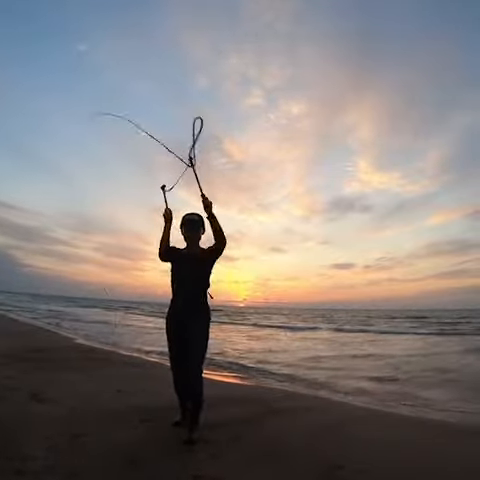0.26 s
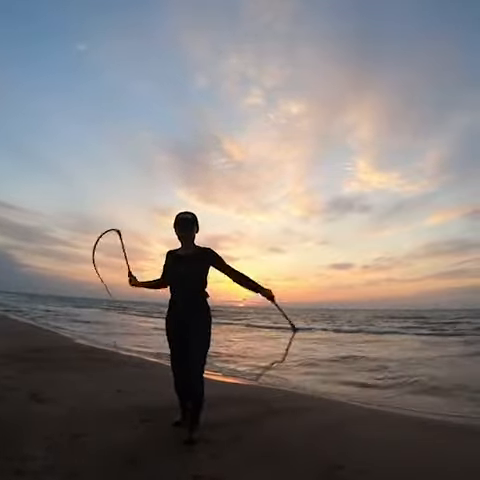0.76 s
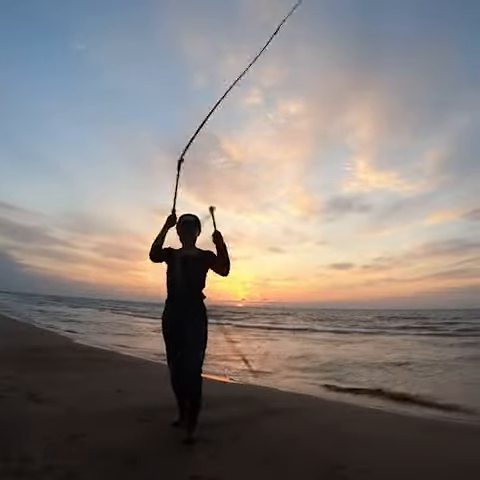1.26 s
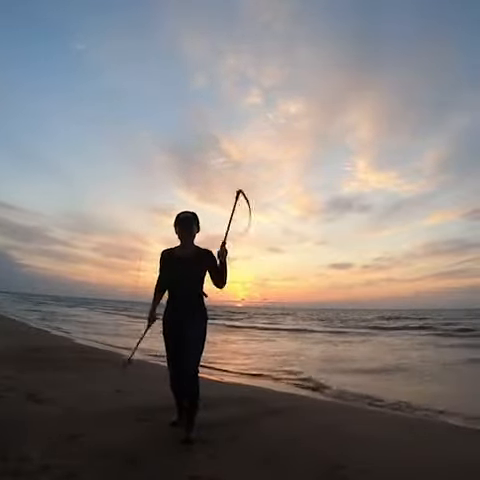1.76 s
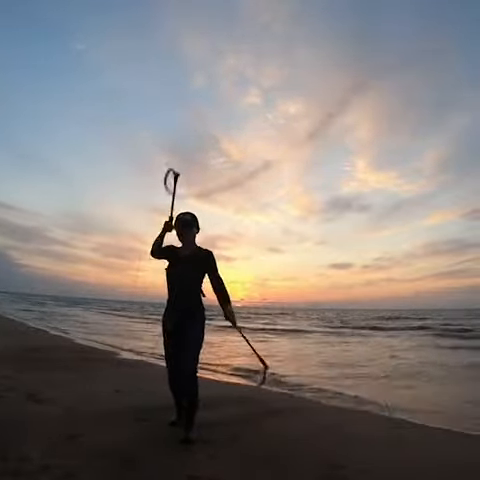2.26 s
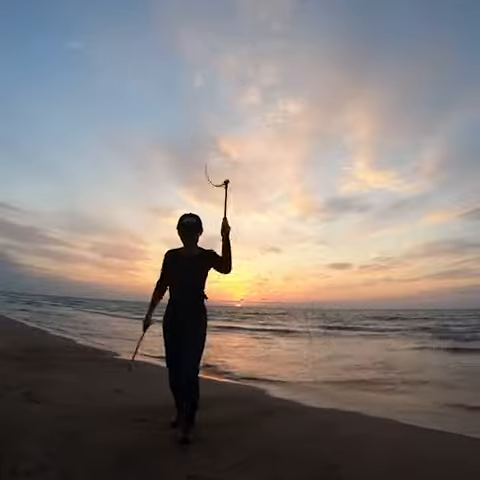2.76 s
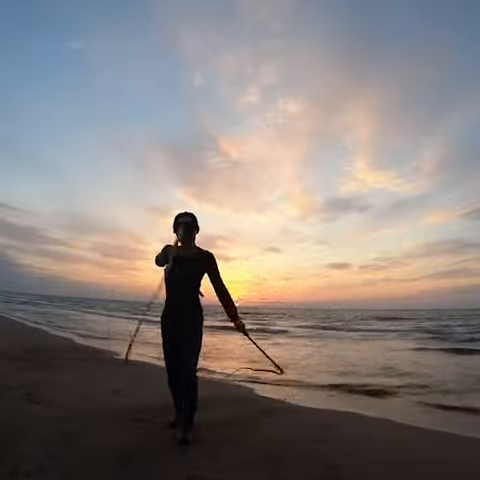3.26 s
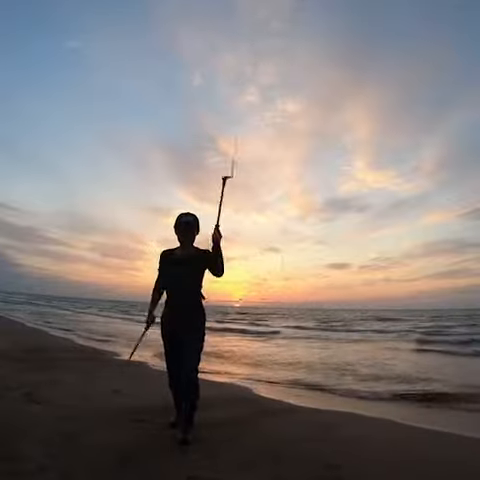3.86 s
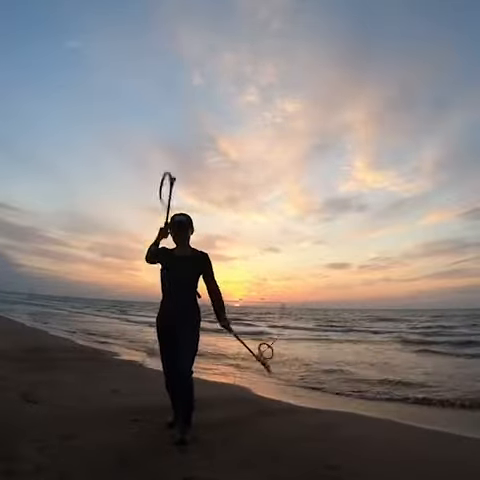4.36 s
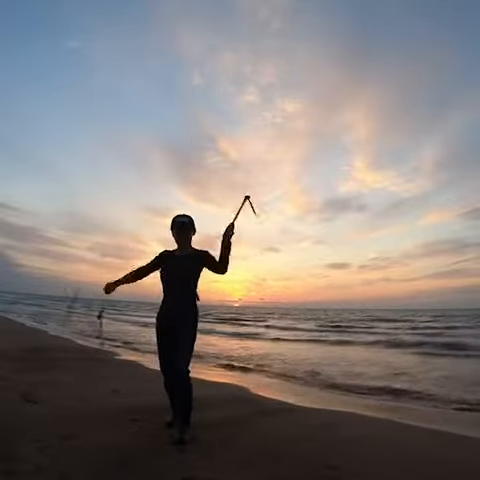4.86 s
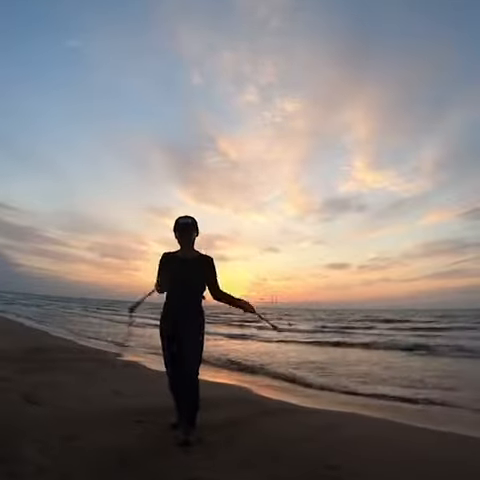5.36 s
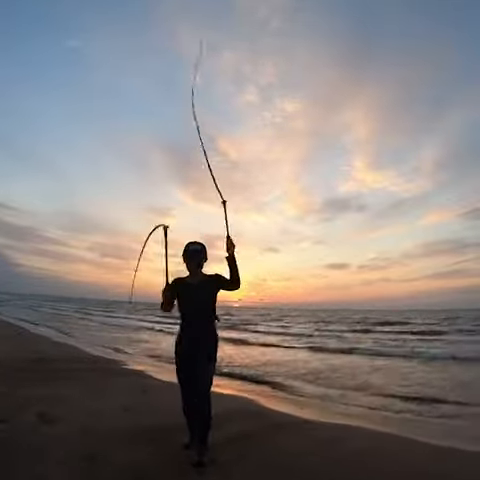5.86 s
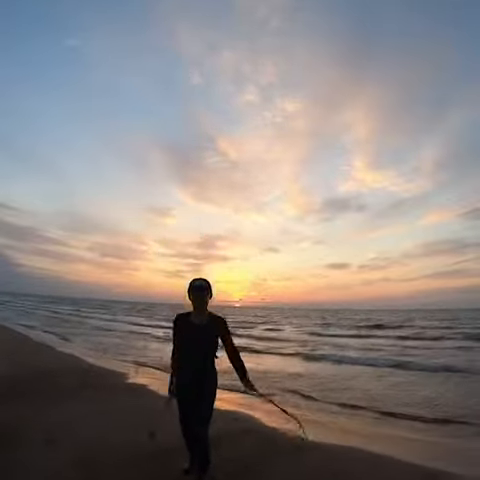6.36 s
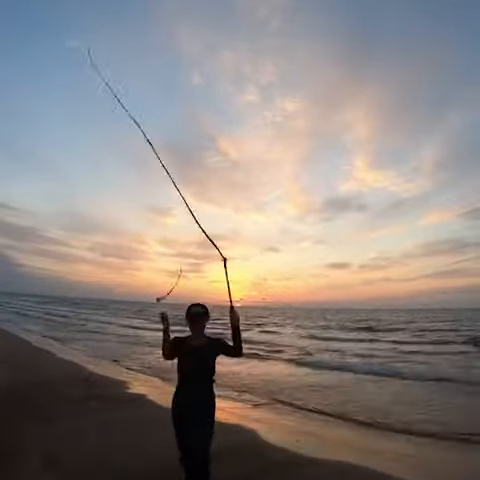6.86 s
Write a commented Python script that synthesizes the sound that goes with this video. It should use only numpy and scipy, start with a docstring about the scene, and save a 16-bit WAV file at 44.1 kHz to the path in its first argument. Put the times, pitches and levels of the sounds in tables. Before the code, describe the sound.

On an open beach, two whips are swung and cracked close to the microphone. Hard, bright, gunshot-like snaps come about once or twice a second, mixed with much weaker flicks and short airy swishes. Low fuzzy hums of the moving lashes fill some gaps. Behind them lie faint steady surf hiss and deep wind rumble. The loud cracks clip slightly and briefly push down the background.

```python
"""On a beach, two whips crack and snap in front of a microphone.
Far surf is filtered noise in stereo; wind is a deep rumble and a flutter that each crack stirs up.
Lashes hum as tones blurred by noise. Each crack is a short shock and a tail; loud ones push the membrane.
A streaky pre-echo hiss lies ahead of each crack, and thin pre-echo tones ahead of the loud ones.
A limiter pulls everything above the bass down after every loud crack."""
import sys
import numpy as np
from scipy import signal
from scipy.fft import rfft, irfft, next_fast_len
from scipy.io import wavfile
from scipy.ndimage import uniform_filter1d, map_coordinates

SR = 44100
rng = np.random.default_rng(int(sys.argv[2]) if len(sys.argv) > 2 else 0)


def wav_record(signal):
    """Record a signal, one row per channel, as 16-bit PCM in the file named by sys.argv[1]."""
    frames = np.transpose(np.atleast_2d(signal))
    bounded = np.clip(frames, -1, 1)
    # unit amplitude maps onto the largest positive 16-bit level
    quanta = np.round(bounded * 32767).astype(np.int16)
    wavfile.write(sys.argv[1], SR, quanta)


def gain_from_decibels(decibels):
    """Convert decibel values to linear amplitude factors."""
    exponent = np.asarray(decibels, float) / 20
    return 10 ** exponent


N = 313551
TIME = np.arange(N) / SR


def unit(x):
    """Normalization: scales a signal to rms 1."""
    return x / np.sqrt(np.mean(x ** 2) + 1e-20)


def along(points, hz):
    """Logarithmic interpolation: reads (frequency [Hz], value) points on a log frequency axis."""
    point_hz, value = np.transpose(points)
    return np.interp(np.log(hz + 1), np.log(point_hz + 1), value)


def curves(rows):
    """Linear interpolation: one value per sample for each column after the time."""
    s, *columns = np.transpose(rows)
    return [np.interp(TIME, s, column) for column in columns]


def wobble(rate, count=N):
    """Band-limited fluctuation: a smooth curve through random knots, rate of them a second."""
    knots = rng.standard_normal(int(count * rate / SR) + 8)
    return map_coordinates(knots, [np.arange(count) * rate / SR + 2])


def filtered(x, response):
    """Linear filtering: multiplies the spectrum of x by a response of frequency."""
    size = next_fast_len(x.shape[-1] + 8192)
    spectrum = rfft(x, size) * response(np.fft.rfftfreq(size, 1 / SR))
    return irfft(spectrum, size)[..., :x.shape[-1]]


def rush(spectrum):
    """Coloured noise: white noise shaped by a spectrum, at rms 1."""
    return unit(filtered(rng.standard_normal(N), lambda hz: gain_from_decibels(along(spectrum, hz))))


def add(track, s, sound, before):
    """Superposition: mixes in a sound whose moment s lies `before` samples into it."""
    start = round(s * SR) - before
    track[..., start:start + sound.shape[-1]] += sound


# strength of the surf: (time [s], level [dB])
SURF_LEVEL = [(0, -36), (.08, -45), (.4, -48.5), (.7, -51.5), (1.1, -48), (1.3, -49), (2, -49.5),
              (2.4, -51), (4.8, -50), (5.2, -46.5), (5.7, -47), (6.2, -48.5), (6.5, -50.5), (7.11, -49.5)]
# spectrum of the surf through the microphone housing: (frequency [Hz], relative level [dB])
SURF_SPECTRUM = [(180, 1), (300, 0.5), (469, -4), (560, -16.5), (822, -6), (1070, -22), (1310, -14.5),
                 (1700, -11), (2940, -16.5), (3600, -13.5), (4820, -21.5), (7050, -18), (8900, -24.5),
                 (9500, -31), (11500, -32), (12000, -43.5), (15600, -57.5)]
# stereo width of the surf: (frequency [Hz], side over mid [dB])
SURF_WIDTH = [(300, -60), (1000, -32), (10500, -28), (11800, -3), (16000, -3)]


def surf():
    """Incoherent sum of far breakers: a smooth hiss with shallow patches, wider in the treble."""
    bins = signal.stft(rng.standard_normal(N), nperseg=512)[2]
    field = uniform_filter1d(rng.standard_normal(bins.shape), size=8, axis=0)  # across frequency
    field = uniform_filter1d(field, size=10, axis=1)  # across time
    patchy = signal.istft(bins * gain_from_decibels(1.2 * unit(field)), nperseg=512)[1][:N]
    mid = unit(filtered(patchy, lambda hz: gain_from_decibels(along(SURF_SPECTRUM, hz))))
    side = filtered(rush(SURF_SPECTRUM), lambda hz: gain_from_decibels(along(SURF_WIDTH, hz)))
    level_db, = curves(SURF_LEVEL)
    return gain_from_decibels(level_db) * np.array([mid + side, mid - side])


# strength of the wind at the microphone: (time [s], level [dB])
WIND_STRENGTH = [(0.0, -51.5), (0.04, -37), (0.36, -43.5), (0.49, -28), (0.67, -44), (2.0, -32.5),
                 (2.51, -46.5), (2.77, -33), (3.62, -43.5), (3.82, -30), (3.84, -34), (4.63, -39),
                 (4.93, -32.5), (5.8, -40.5), (6.0, -26.5), (6.38, -46), (7.01, -31.5), (7.11, -45.5)]
# spectrum of the deep rumble: (frequency [Hz], relative level [dB])
RUMBLE_SPECTRUM = [(12, -18), (25, 1), (55, -1), (80, -22.5), (150, -68)]
# spectrum of the flutter: (frequency [Hz], relative level [dB])
FLUTTER_SPECTRUM = [(40, -20.5), (70, -3.5), (100, -7), (140, -13.5), (200, -20.5), (400, -66)]
# eddies that hit the microphone: (time [s], length [s], level [dB])
MICROPHONE_EDDIES = [(.1, 0.17, -47), (1.48, 0.18, -42.5), (1.717, 0.063, -21.5), (2.004, 0.057, -24.5),
                     (2.436, .12, -40.5), (2.769, 0.1, -24), (3.137, 0.19, -29.5), (3.696, 0.085, -37),
                     (4.455, 0.062, -32.5), (4.701, 0.17, -33.5), (4.943, 0.11, -19), (5.557, .12, -30.5),
                     (6.004, 0.051, -26), (6.92, 0.4, -39)]


def wind():
    """Turbulent pressure: a rumble and a lumpier flutter stirred by eddies and each crack's wake."""
    flutter_db, flutter_grows = -44, 0.4  # steady flutter; dB per dB of wind
    wake_db, wake_grows = -36, 1.76  # air thrown by a crack: level at a 0 dB crack; dB per dB of crack
    wake_rise_s, wake_fall_s = 0.0082, 0.012  # time constants
    strength_db, = curves(WIND_STRENGTH)
    rumble = gain_from_decibels(strength_db + 2.0 * wobble(6.2)) * rush(RUMBLE_SPECTRUM)
    gust_db = strength_db - strength_db.mean()
    stir = gain_from_decibels(flutter_db + flutter_grows * gust_db + 1.5 * wobble(3.6))
    for s, length, db in MICROPHONE_EDDIES:
        stir = stir + gain_from_decibels(db) * np.exp(-(2 * (TIME - s) / length) ** 2)
    for s, crack_db, *_ in WHIP_CRACKS:
        lag = np.where(TIME < s, (s - TIME) / wake_rise_s, (TIME - s) / wake_fall_s)
        stir = stir + gain_from_decibels(wake_db + wake_grows * crack_db) * np.exp(-lag)
    flutter = unit(gain_from_decibels(2.03 * wobble(25)) * rush(FLUTTER_SPECTRUM))
    return rumble + stir * flutter


# sweeps of a lash through the air or over the sand:
# (start [s], end [s], first pitch [Hz], last pitch [Hz], level before swell and wobble [dB])
LASH_SWEEPS = [(0.548, 1.093, 339.5, 365.6, -52.5), (1.18, 1.314, 222.5, 203, -47.5),
               (1.753, 1.964, 363, 357, -48.5), (1.978, 2.367, 251, 226.7, -50.5),
               (2.397, 2.51, 237, 203.5, -46), (3.601, 3.76, 235, 259, -49.5),
               (4.441, 4.665, 279, 198.7, -43), (4.653, 4.89, 236.4, 174, -37),
               (4.991, 5.174, 253.6, 275, -46.5), (5.225, 5.34, 256, 232, -47),
               (5.46, 5.699, 254.4, 299, -42.5), (6.049, 6.227, 345, 413, -48),
               (6.183, 6.416, 415, 489.4, -52.5), (6.149, 6.563, 751, 785, -52),
               (6.706, 7.014, 709, 828, -57.5)]
# the lash slows after a full crack and its hum sinks: (time [s], level before swell and wobble [dB])
LASH_RECOILS = [(.5, -44), (2.74, -41), (3.051, -43.5), (3.799, -40)]
# the thin tip swishes after a light snap: (time [s], level before swell and wobble [dB])
TIP_SWISHES = [(0.729, -47), (1.16, -48), (2.21, -49), (3.272, -52), (4.31, -52), (6.49, -50)]


def lashes():
    """Vortex shedding: a swept cord gives a fuzzy hum whose pitch follows its speed."""
    track = np.zeros(N + SR)
    recoils = [(s, s + 0.18, 214.3, 157.7, db) for s, db in LASH_RECOILS]
    swishes = [(s, s + 0.055, 2310, 1343, db) for s, db in TIP_SWISHES]
    for start, end, first_hz, last_hz, db in LASH_SWEEPS + recoils + swishes:
        u = np.linspace(0, 1, round((end - start) * SR))
        count = len(u)
        hz = first_hz * (last_hz / first_hz) ** u
        rate = 0.2 * first_hz * (first_hz / 250) ** 0.45  # faster sweeps blur more
        fuzz = wobble(rate, count) + 1j * wobble(rate, count)
        carrier = np.exp(2j * np.pi * np.cumsum(hz) / SR)
        hum = unit((fuzz * carrier).real)
        swell = np.sin(np.pi * u ** 1.1) ** 0.43
        unsteady = gain_from_decibels(4.04 * wobble(60, count))
        add(track, start, gain_from_decibels(db) * swell * unsteady * hum, before=0)
    return track[:N]


# thin tones smeared ahead of the loud cracks:
# (time [s], deep pitch [Hz], low pitch [Hz], high pitch [Hz], second high pitch [Hz])
PRE_ECHO_TONES = [(.4872, 1860, 3670, 7890, 9150), (1.0592, 1990, 3700, 7150, 8320),
                  (1.7017, 2007, 3805, 6840, 9650), (1.9782, 1930, 3645, 8940, 6850),
                  (2.751, 2110, 3690, 7240, 10250), (3.0531, 2010, 3570, 7230, 9780),
                  (3.7999, 2370, 3980, 6580, 9370), (4.1026, 2450, 3970, 6910, 9600),
                  (4.8928, 1940, 3696, 8850, 6830), (5.374, 2420, 3690, 7200, 8650),
                  (5.9823, 2060, 3650, 8100, 9780), (6.2411, 1720, 3670, 9600, 9980),
                  (7.1066, 2066, 3635, 8100, 9250)]


def pre_echo_tones():
    """Pre-echo: thin tones rise for 38 ms before a crack, all but the low one fluttering, the deep one most."""
    track, t = np.zeros(N + SR), (np.arange(3072) - 2048) / SR
    swell = np.sin(np.pi / 2 * np.clip(1 + t / 0.038, 0, 1)) ** 2.5
    shape = np.where(t < 0, swell, gain_from_decibels(-2.5 - 60 * t / 0.091))  # falls 60 dB in 91 ms
    for s, deep_hz, low_hz, high_hz, second_hz in PRE_ECHO_TONES:
        crack_db = min(WHIP_CRACKS, key=lambda row: abs(row[0] - s))[1]  # nearest crack
        # level at a 0 dB crack, then dB per dB of crack
        deep_db = -43.5 + 0.71 * crack_db
        low_db = -45.5 + 1.89 * crack_db
        high_db = -30 + 0.35 * crack_db
        # pitch, level and the steady part against the fluttering one
        tones = [(deep_hz, deep_db, 0.35), (low_hz, low_db, 3.0),
                 (high_hz, high_db, 0.7), (second_hz, high_db - 5.5, 0.7)]
        for hz, db, steady in tones:
            fuzz = steady + wobble(0.06 * hz, len(t)) + 1j * wobble(0.0466 * hz, len(t))
            carrier = np.exp(2j * np.pi * (hz * t + rng.random()))
            tone = unit((fuzz * carrier).real)
            add(track, s, gain_from_decibels(db) * shape * tone, before=2048)
    return track[:N]


def thumps():
    """Damped oscillation: a loud shock pushes the membrane through a slow swing out and back."""
    loud_db = 2  # softer cracks do not push
    drive_db, drive_grows = -11, 0.28  # drive = drive_db + drive_grows * crack level
    track, t = np.zeros(N + SR), np.arange(3072) / SR
    onset = 1 - np.exp(-t / 0.00048)
    push = np.sin(2 * np.pi * 105 * t) * gain_from_decibels(-60 * t / 0.036) * onset  # falls 60 dB in 36 ms
    for s, crack_db, *_ in WHIP_CRACKS:
        if crack_db > loud_db:
            add(track, s, gain_from_decibels(drive_db + drive_grows * crack_db) * push, before=0)
    return track[:N]


# cracks and snaps: (time [s], shock peak [dB], spectral tilt [dB per octave], tail level at its start [dB])
WHIP_CRACKS = [(0.4875, 10.5, -2.5, -23), (0.7276, -17.5, -4, -22.5), (0.7796, -33, -1.5, -41),
               (0.793, -37, 3, -46.5), (0.9078, -21, -3.5, -43.5), (1.0604, -5, 2.5, -16.5),
               (1.7007, 11.5, -1.5, -9), (1.9777, 7.5, 1.2, -17.5), (2.2205, -44, -4.5, -30),
               (2.2657, -27.5, -1.5, -58), (2.7504, 10.5, -4.5, -38), (3.0531, 7, 2.4, -33),
               (3.2764, -30, -7, -29), (3.5312, -44, -10, -39.5), (3.7996, 10, -2.5, -47),
               (4.084, -31, 1, -45), (4.1047, 3.5, 1, -24), (4.3197, -33, -5, -39.5),
               (4.474, -31.5, -2, -50), (4.8921, 10, -2.7, -20), (4.9573, -18, 5, -70),
               (5.067, 0.5, -4.5, -18), (5.1056, -26, 5, -35), (5.232, -15, -3, -57),
               (5.375, 2.5, 1, -14.5), (5.455, -36, -6.5, -33.5), (5.6085, -14.5, -1.5, -27),
               (5.9802, 9, -2.5, -19), (6.2394, -0.5, -0.5, -46), (6.5008, -31.5, -3, -36.5),
               (6.7216, -43, -7.5, -34), (6.991, -62, -15, -35.5), (7.1066, 10, -2.3, -9.5)]
# spectrum of the shock before its tilt: (frequency [Hz], relative level [dB])
SHOCK_SPECTRUM = [(350, -33.5), (600, -11.5), (1000, -16.5), (1830, -2), (2880, -3.5), (4570, -6.5),
                  (8320, -1), (11100, -16.5), (13500, -16.5), (15600, -48.5)]


def cracks():
    """Shock wave and scattering: a shock rings the microphone port, sand adds a tail; pre-echo precedes."""
    track, t = np.zeros((2, N + SR)), (np.arange(4608) - 1536) / SR
    after = np.clip(t, 0, None)
    fading = gain_from_decibels(-60 * after / 0.081) / (1 + after / 0.0036) * (t > 0)
    rising = np.clip(1 + t / 0.034, 0, 1) ** 2.5 * (t < 0)
    for s, db, tilt_db, tail_db in WHIP_CRACKS:
        def colour(hz):
            """Spectral tilt: the shock spectrum turned about 4.5 kHz."""
            return gain_from_decibels(along(SHOCK_SPECTRUM, hz) + tilt_db * np.log2(hz / 4500 + 0.05))

        noise, stray = rng.standard_normal((2, len(t)))
        front = filtered(1.0 * (t == 0), colour)
        ring_ms = max(0.21 + 0.01 * tilt_db, 0.1)  # longer on a bright crack
        ring = np.sin(2 * np.pi * 4600 * t) * np.exp(-(1000 * t / ring_ms) ** 4)
        shock = front / front.max() + 0.34 * ring
        echo_db = -7 + min(-db - 14, 0.0)  # off the sand, relatively fainter for strong cracks
        shock += gain_from_decibels(echo_db) * np.roll(shock, round(0.0027 * SR))
        shock *= gain_from_decibels(db) / np.abs(shock).max()
        tail = gain_from_decibels(tail_db) * fading * unit(filtered(noise, colour))
        # pre-echo: a hiss with random spectral streaks, not part of the crack itself
        stripes = np.transpose([np.linspace(300, 16000, 40), rng.normal(0, 6, 40)])
        streaked = unit(filtered(stray, lambda hz: np.sqrt(colour(hz)) * gain_from_decibels(along(stripes, hz))))
        pre_echo = gain_from_decibels(1.06 * db - 36.5) * rising * streaked
        mid = shock + tail + pre_echo
        aside = gain_from_decibels(-14) * np.gradient(mid) * np.sign(stray[0])  # slightly off axis, on a random side
        add(track, s, np.array([mid + aside, mid - aside]), before=1536)
    return track[:, :N]


def scene():
    """Superposition of surf, wind, lashes and cracks at the microphone, with the pre-echo tones."""
    return surf() + wind() + lashes() + pre_echo_tones() + thumps() + cracks()


def top_cut(x):
    """Nothing passes above the cut-off."""
    return signal.sosfilt(signal.butter(12, 15730, fs=SR, output="sos"), x)


def record(dry):
    """Dynamic compression: a limiter ducks all but the bass and lets go slowly; then soft clipping."""
    knee_db, ratio, release_db = -12, 0.75, 95  # threshold; dB cut per dB above it; dB per second
    split_hz, top_hz, smoothing_s = 450, 15300, 0.0043
    bass = filtered(dry, lambda hz: 1 / (1 + (hz / split_hz) ** 6))
    treble = dry - bass
    level_db = 20 * np.log10(np.abs(treble).max(0) + 1e-6)
    # peak hold that falls release_db a second
    held_db = np.maximum.accumulate(level_db + release_db * TIME) - release_db * TIME
    lag = np.exp(-1 / (smoothing_s * SR))
    cut_db = signal.lfilter([1 - lag], [1, -lag], ratio * np.clip(held_db - knee_db, 0, None))
    limited = bass + treble * gain_from_decibels(-cut_db)
    clipped = limited / (1 + np.abs(limited / 0.85) ** 4) ** (1 / 4)
    finished = filtered(clipped, lambda hz: 1 / (1 + (hz / top_hz) ** 40))
    return top_cut(finished)


dry = scene()
out = record(dry)
wav_record(out)
```